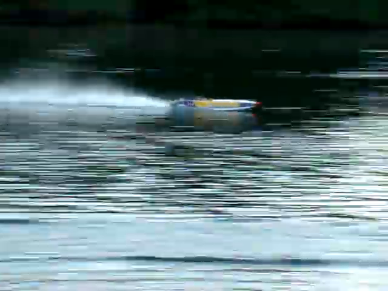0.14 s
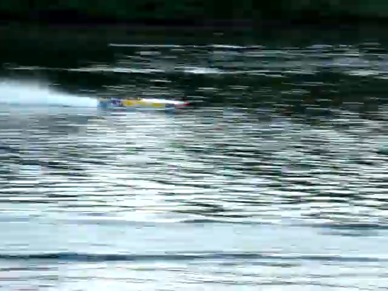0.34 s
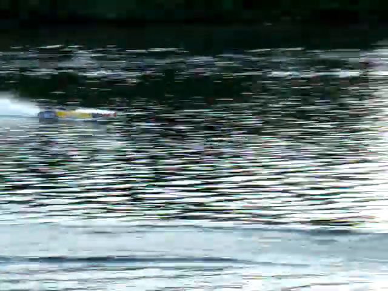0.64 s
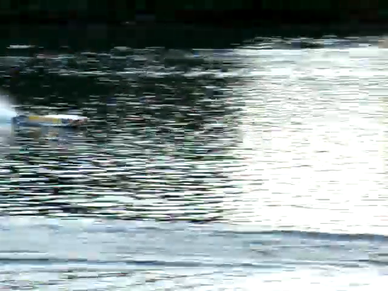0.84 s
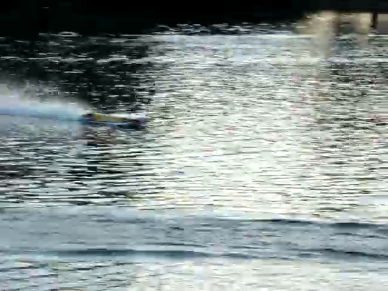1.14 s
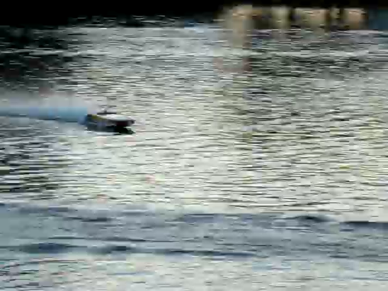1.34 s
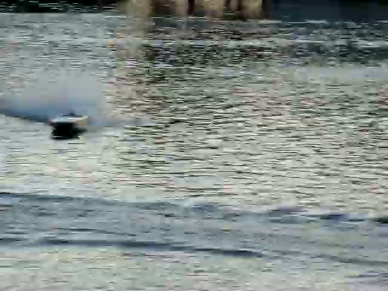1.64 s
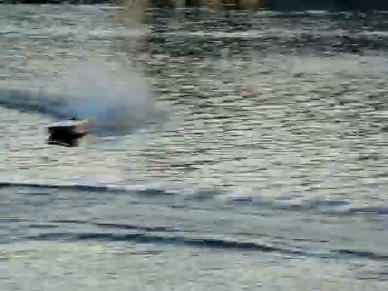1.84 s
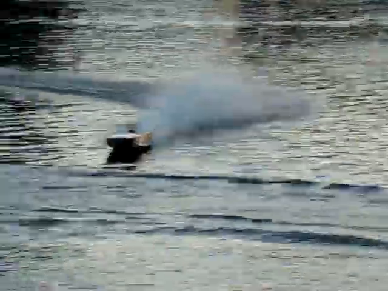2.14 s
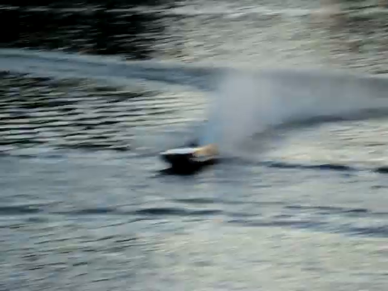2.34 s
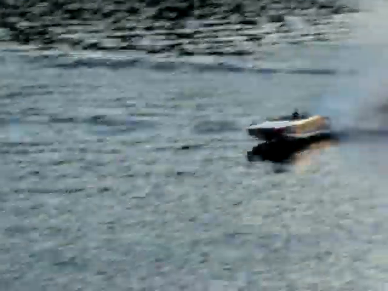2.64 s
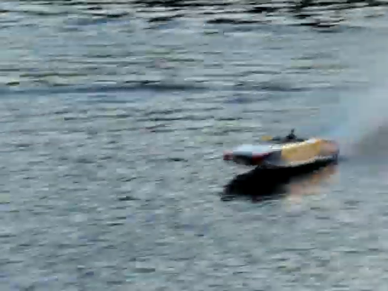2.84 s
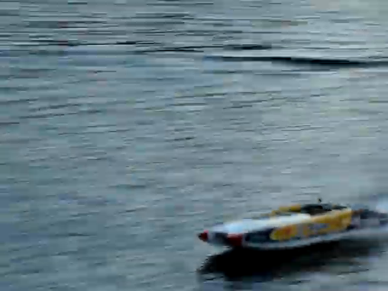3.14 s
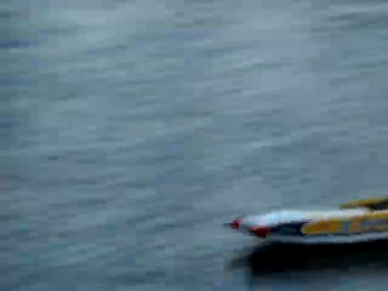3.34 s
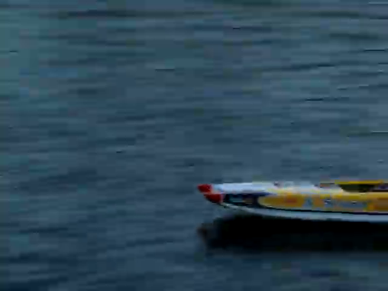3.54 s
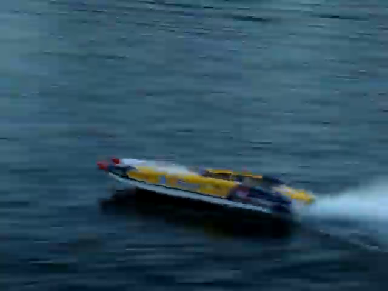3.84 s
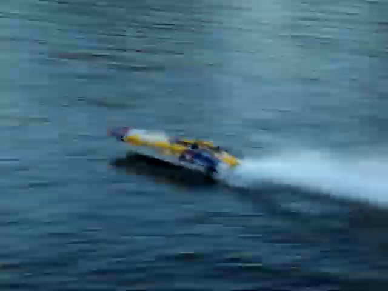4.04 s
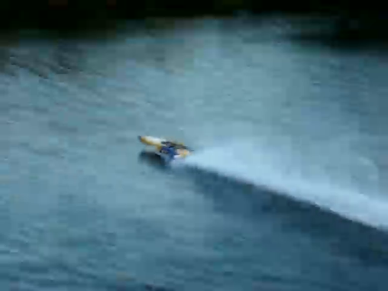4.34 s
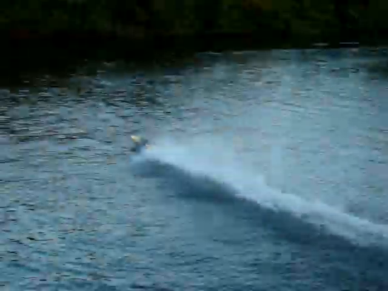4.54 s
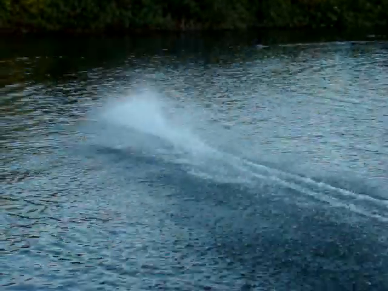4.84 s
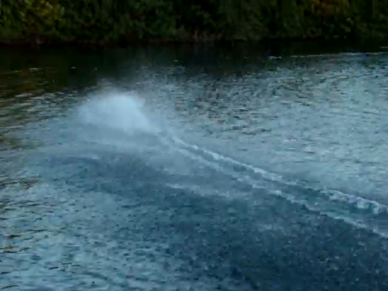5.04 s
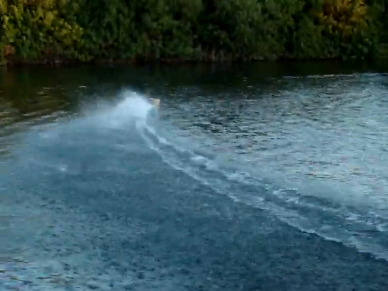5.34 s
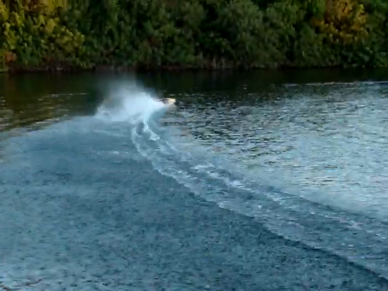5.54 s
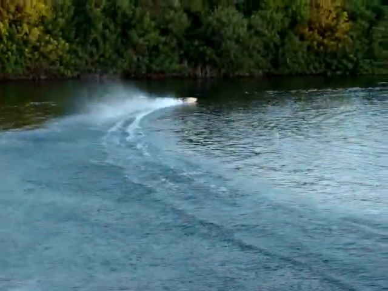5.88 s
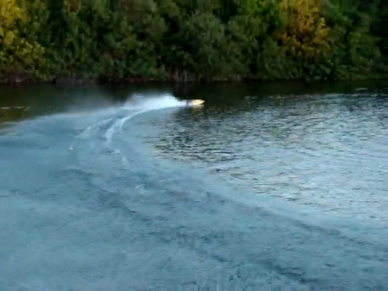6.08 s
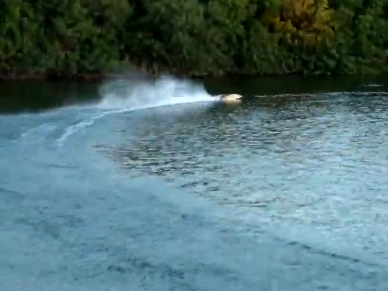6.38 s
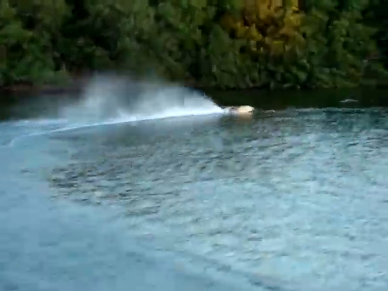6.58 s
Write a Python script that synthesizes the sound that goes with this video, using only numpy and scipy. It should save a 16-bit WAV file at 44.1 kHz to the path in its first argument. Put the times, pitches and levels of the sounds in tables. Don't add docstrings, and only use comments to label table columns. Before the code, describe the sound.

A model boat's raspy engine laps near a single bank microphone. Its falling note breaks into uneven pops while blurred echoes of an earlier run hang over the water. It revs up with wavering metallic overtones, passes loudly, stutters, pulls away and grows thin and quiet. Two more stutters lead to hull slaps and rising revs; a tiny camera motor hums very faintly.

```python
import sys
import numpy as np
from scipy import signal
from scipy.fft import rfft, irfft, next_fast_len
from scipy.io import wavfile
from scipy.ndimage import uniform_filter1d, map_coordinates

SR = 44100
rng = np.random.default_rng(int(sys.argv[2]) if len(sys.argv) > 2 else 0)


def transcribe(signal):
    frames = np.atleast_2d(signal).T
    limited = np.clip(frames, -1, 1)
    pcm = np.round(limited * 32767).astype(np.int16)
    wavfile.write(sys.argv[1], SR, pcm)


def elevation(decibels):
    levels = np.asarray(decibels, float)
    return 10 ** (levels / 20)


N = 295911

# (from [s], to [s], size of even firings [ratio], of odd firings [ratio])
MISFIRES = [
    (.5, .855, .25, .25),
    (3.225, 3.495, .4, .4),
    (5.2, 5.33, .6, .55),
    (5.92, 6.04, .3, .3),
]
# (time [s], round trip [ms], return level [dB], clutter level [dB])
RETURN = [(0, 1.5, -14, -2), (1.5, 1.45, -13, -2), (1.9, 1.2, -13, -3), (2.0, 2.45, -13, -4),
          (3.0, 2.38, -11, -4), (3.3, 2.5, -13, -4), (3.7, 2.5, -13, -4), (4.1, 2.59, -9, -6),
          (5.0, 2.66, -11, -6), (5.65, 2.61, -9, -6), (6.1, 2.58, -13, -7), (6.45, 2.6, -10, -9),
          (6.71, 2.6, -10, -9)]
# (time [s], exhaust level [dB], pipe mouth facing camera [dB], hull side level [dB],
# pipe on tune [dB])
COURSE = [(0, -27.5, -18, -37, -1.5), (.3, -29.5, -24.5, -40, 3.5), (.6, -28.5, -3.5, -32, -6.5),
          (.95, -24, -11, -34, -12), (1.3, -26.5, -13, -30, -9), (1.65, -27, -18.5, -28, 4),
          (2.05, -24.5, -6.5, -32.5, 2), (2.6, -22, 0.5, -31, -7), (2.95, -25.5, -5, -38.5, -4.5),
          (3.3, -30, 0.5, -44.5, 5.5), (3.8, -29.5, 13, -45.5, 1.5), (4.3, -27, 9, -54, 0),
          (4.85, -28, -7, -54, -1), (5.05, -37.5, 9, -57.5, -1.5), (5.45, -40, 16, -49.5, 3.5),
          (5.85, -38.5, 10.5, -55, 2), (6.22, -24.5, -8, -48, -3.5), (6.71, -24, -2, -36.5, -0.5)]
# (time [s], level [dB], half length [s], extra howl [dB])
BLASTS = [(0.422, -11, 0.11, -2), (0.81, 1, 0.082, 3), (0.96, 2.5, 0.18, 7), (1.645, -4, 0.039, -3),
          (2.03, 0, 0.34, 8), (2.29, 0, 0.21, 5.5), (2.597, 2, 0.012, 3.5), (2.88, 5.5, 0.022, 2.5),
          (2.936, 7, 0.043, -5), (3.061, 6, 0.022, 4.5), (3.104, 0.5, 0.024, 1.5),
          (3.147, -19.5, 0.09, 9.5), (3.374, -0.5, 0.085, 7.5), (3.51, 2, 0.058, 2.5), (4.303, -2, 0.03, 0),
          (4.397, 2.5, 0.057, -2), (4.527, 3.5, 0.027, -7), (4.594, 5.5, 0.011, 1), (4.793, 2, 0.055, -2.5),
          (4.635, 4, 0.064, -5), (4.927, 5, 0.057, 2.5), (4.988, -10, 0.035, 14.5), (5.148, 6.5, 0.067, -1),
          (5.254, 0.5, 0.081, -4.5), (5.312, 0.5, 0.064, -1.5), (5.518, 3.5, 0.17, -5),
          (5.732, 6, 0.13, 0.5), (6.197, -1, 0.048, 7), (6.292, 0, .06, -8), (6.407, 4.5, 0.023, 0),
          (6.456, 2, 0.018, -3), (6.62, 2, 0.017, -2), (6.573, -1, .03, 4)]


def unit(x):
    return x / np.sqrt(np.mean(x ** 2) + 1e-20)


def curves(rows):
    s, *cols = np.transpose(rows)
    return [np.interp(np.arange(N) / SR, s, c) for c in cols]


def bumps(rows):
    t = np.arange(N) / SR
    return sum(h * np.interp(t, [s - rise, s, s + fall], [0, 1, 0]) for s, h, rise, fall in rows)


def wobble(rate_hz):
    knots = rng.standard_normal(int(N * rate_hz / SR) + 4)
    return map_coordinates(knots, [np.arange(N) * rate_hz / SR])


def filtered(x, response):
    m = next_fast_len(N + SR // 2)
    return irfft(rfft(x, m) * response(np.fft.rfftfreq(m, 1 / SR)), m)[:N]


def resonant(x, modes, sign=-1):
    def response(f):
        return sum(sign ** k * elevation(db) * 1j * f * w / (c * c - f * f + 1j * f * w)
                   for k, (c, w, db) in enumerate(modes))
    return filtered(x, response)


def low_cut(x, hz):
    return signal.sosfilt(signal.butter(3, hz, "high", fs=SR, output="sos"), x)


def levelled(x):
    return x / np.sqrt(np.abs(uniform_filter1d(x ** 2, SR // 8)) + 1e-12)


def pulses(at, size):
    index = np.floor(at).astype(int)[:, None] + np.arange(-7, 9)
    offset = index - at[:, None]
    kernel = np.sinc(offset) * np.cos(np.pi * offset / 16) ** 2
    return np.bincount(np.clip(index, 0, N).ravel(), (kernel * size[:, None]).ravel(), N + 1)[:N]


def decaying(x, fall_s):
    return signal.lfilter([1], [1, -np.exp(-1 / (fall_s * SR))], x)


def engine():
    # (time [s], rate [firings/s])
    throttle = [(-0.0, 222.1), (0.092, 167.0), (0.445, 84.2), (0.73, 126.2), (1.387, 119.5), (2.045, 250.1),
                (2.33, 221.5), (2.597, 243.8), (2.932, 231.3), (3.221, 138.1), (3.698, 183.7),
                (3.848, 228.9), (4.933, 233.3), (5.03, 183.5), (5.81, 211.8), (5.923, 132.1),
                (6.237, 191.8), (6.71, 225.4)]
    # (time [s], change [firings/s], rise
    # [s], fall [s])
    hops = [(0.949, 60.4, 0.13, 0.34), (1.627, 39.8, 0.18, 0.1), (1.81, -48.1, 0.09, 0.22),
            (2.585, 10, .015, .04), (4.575, 6, .03, .02), (3.93, -5, .03, .03), (2.718, 6.2, 0.16, 0.03),
            (2.766, -21.4, 0.03, 0.16), (3.08, 20.8, 0.05, 0.11), (3.29, -12.8, 0.06, 0.1),
            (3.46, -19.3, 0.08, 0.05), (3.53, 9.6, 0.02, 0.18), (4.069, -11.4, 0.21, 0.3),
            (4.365, -10.1, 0.3, 0.29), (4.623, -14.9, 0.09, 0.17), (4.84, -17.8, 0.06, 0.08),
            (5.17, 22.0, 0.07, 0.04), (5.251, -28.0, 0.05, 0.16), (5.311, -12.4, 0.06, 0.12),
            (5.64, 1.2, 0.24, 0.27), (6.038, -18.0, 0.1, 0.1), (6.43, 11.9, 0.06, 0.27),
            (1.53, -5, .04, .03), (1.58, 5, .04, .04), (1.79, 4, .04, .03), (1.855, -16, .03, .03),
            (2.05, 3, .03, .03), (2.14, 2, .04, .04), (2.34, 4, .04, .04), (2.51, -3, .06, .05),
            (2.58, 5, .015, .02), (2.64, -4, .04, .08), (2.78, 4, .025, .03), (2.845, -3, .04, .015),
            (2.875, 3, .02, .05), (3.86, 4, .03, .03), (3.98, 5, .04, .025), (4.02, -4, .02, .03),
            (4.62, -3, .03, .03), (4.74, -4, .03, .03), (4.86, -6, .03, .025), (4.9, 5, .025, .03),
            (5.18, 4, .03, .03), (6.09, 4, .04, .03), (6.14, -5, .025, .03), (6.3, -3, .03, .03),
            (6.37, 3, .05, .06), (6.58, -3, .03, .04)]
    inertia_s = .022
    rate = uniform_filter1d(curves(throttle)[0] + bumps(hops), round(inertia_s * SR))
    turns = np.cumsum(rate * (1 + .002 * wobble(25))) / SR
    blast_db = bumps([(s, db, half, half) for s, db, half, _ in BLASTS])
    return exhaust(turns, rate, blast_db) + shaft_orders(turns, rate, blast_db) + singing(turns)


def exhaust(turns, rate, blast_db):
    # (frequency [Hz], width [Hz], level [dB])
    boom_modes = [(1060, 190, 0), (1290, 190, -1), (880, 150, -7)]
    howl_modes = [(1625, 280, -7), (1950, 235, 0.5)]
    bark_modes = [(2642, 650, 24), (3120, 370, 17.5), (4630, 1700, -4.5)]
    rasp_modes = [(4950, 850, -6.5), (6500, 3600, 3.5), (8100, 400, -4.5)]
    # (level over exhaust [dB], share of swings, share of facing, share of tune)
    boom_law = (-7, 1.13, -0.01, 1.16)
    howl_law = (-6.5, 0.95, 0.07, 0.35)
    rasp_law = (-12.5, 2.53, 1.4, 2)
    mean_db = -28

    cracks, puffs = firings(turns, rate, jitter=.003, puff_s=.004)
    cracks = cockpit(cracks, ring_s=.03, ring_db=curves(RETURN)[2])
    bark_db, facing_db, _, tune_db = curves(COURSE)
    bark_db = bark_db + blast_db
    sing_db = bumps([(s, db, half, half) for s, _, half, db in BLASTS])
    flutter_db = 1.2 * wobble(22)

    def range_db(law):
        db, swing, turn, tune = law
        course_db = swing * (bark_db - mean_db) + turn * facing_db + tune * tune_db
        return mean_db + db + course_db + .8 * wobble(8)

    boom = low_cut(low_cut(resonant(cracks + .4 * puffs, boom_modes), hz=820), hz=820)
    howl = low_cut(resonant(cracks + .45 * puffs, howl_modes, sign=1), hz=1200)
    bark = low_cut(resonant(cracks + .45 * puffs, bark_modes, sign=1), hz=1800)
    turbulence = 2.4 * puffs + 1.8 * np.roll(puffs, SR // 400)
    rasp = low_cut(resonant(cracks + turbulence, rasp_modes, sign=1), hz=3500)
    return (elevation(range_db(boom_law)) * levelled(boom)
            + elevation(range_db(howl_law) + sing_db) * levelled(howl)
            + elevation(bark_db + flutter_db) * levelled(bark)
            + elevation(range_db(rasp_law) - .35 * blast_db) * levelled(rasp))


def firings(turns, rate, jitter, puff_s):
    # (load [firings/s], noise share [0-1], size scatter [dB])
    combustion = [(125, .42, 4), (155, .2, 2.2), (180, .055, 1), (225, .035, .75)]
    # (time [s], size over a regular firing [dB])
    pops = [(.519, 4), (.540, 6.5), (0.5716, 9), (0.5895, 3), (.609, 7), (0.6256, 6.5), (.644, 7.5),
            (0.6695, 5.5), (0.6844, 5), (0.7014, 5), (0.718, 7), (.733, 3), (0.75, 6), (.765, 5),
            (0.781, 2.5), (0.7964, 3.5), (0.811, 1), (0.8363, 2.5), (0.8512, -2), (3.2449, 10),
            (3.268, 8.5), (3.282, 11), (3.2963, 4.5), (3.3023, 7), (3.318, 9), (3.3334, 12), (3.348, 10),
            (3.3612, 9.5), (3.365, 0.5), (3.3773, 6), (3.3886, 11), (3.4035, 4), (3.4217, 6.5), (3.434, 2),
            (3.4495, 3), (3.463, 3), (3.4753, 1), (3.4888, -1.5), (5.2135, 2.5), (5.241, -1), (5.271, 6),
            (5.293, -6.5), (5.3028, 4.5), (5.316, -4.5), (5.3266, 0), (5.9327, 2.5), (5.9435, 6.5),
            (5.968, 11), (5.981, 2), (5.991, 10.5), (6.0058, 0.5), (6.022, 10), (6.037, 8.5)]
    lead_s = .14
    rise = np.maximum(uniform_filter1d(np.gradient(rate), SR // 10), 0)
    load = rate + lead_s * SR * rise
    speeds, shares, scatters = np.transpose(combustion)
    share = np.interp(load, speeds, shares)
    scatter_db = np.interp(load, speeds, scatters)

    whole = np.arange(1, int(turns[-1]))
    at = np.interp(whole + jitter * rng.standard_normal(len(whole)), turns, np.arange(N))
    size = elevation(scatter_db[at.astype(int)] * rng.standard_normal(len(at)))
    for a, b, even, odd in MISFIRES:
        inside = (at > a * SR) & (at < b * SR)
        size = np.where(inside, size * np.where(whole % 2, odd, even), size)
    s, db = np.transpose(pops)
    at, size = np.append(at, s * SR), np.append(size, elevation(db))

    cracks = pulses(at, size)
    puffs = decaying(cracks, puff_s) * rng.standard_normal(N) / np.sqrt(puff_s * SR / 2)
    trip_ms, back_db, _ = [c[at.astype(int)] for c in curves(RETURN)]
    cracks = -cracks - pulses(at + trip_ms * SR / 1000, size * elevation(back_db))
    return np.sqrt(1 - share) * cracks, np.sqrt(share) * puffs


def cockpit(x, ring_s, ring_db):
    t = np.arange(SR // 50) / SR
    tails = rng.standard_normal((3, len(t))) * elevation(-60 * t / ring_s) * (t > .0008)
    tails /= np.linalg.norm(tails, axis=1)[:, None]
    echoes = sum(wobble(7) * np.convolve(x, tail)[:N] for tail in tails)
    return x + elevation(ring_db) * echoes / np.sqrt(3)


def shaft_orders(turns, rate, blast_db):
    # (frequency [Hz], level [dB])
    panels = [(90, -11.5), (180, -4.5), (260, -2.5), (375, 1.5), (500, 2), (680, -13), (950, 7)]
    # (level over hull side [dB], share of its swings)
    orders_law = [(-1.5, 0.77), (0, 0.83), (-4, 1.01), (-2, 0.91)]
    side_mean_db, starved_db = -43, -5.5
    starved = [((a + b) / 2, starved_db, b - a, b - a) for a, b, *_ in MISFIRES[1:]]
    side_db = curves(COURSE)[2] + bumps(starved)
    hz, db_at_hz = np.transpose(panels)
    tones = 0
    for order, (db, swing) in enumerate(orders_law, 1):
        panel_db = np.interp(np.log(order * rate), np.log(hz), db_at_hz)
        waver_db = 1.8 * wobble(14) + 2.9 * wobble(30)
        order_db = side_mean_db + swing * (side_db - side_mean_db) + db + .35 * blast_db
        tones = tones + elevation(order_db + panel_db + waver_db) * np.sin(2 * np.pi * order * turns)
    return tones


def singing(turns):
    sings = {2: [(.92, 0.079, 0.11, -34), (1.6, 0.14, 0.2, -30), (2.2, 0.47, 0.22, -32),
             (3.98, 0.21, 0.11, -45), (5.72, 0.12, .1, -42)], 3: [(2.55, 0.69, 0.6, -32),
             (6.15, 0.22, 0.27, -40)], 4: [(.95, 0.092, 0.073, -35), (1.6, 0.15, 0.15, -24),
             (2.3, 0.9, 0.25, -30.5), (4.2, 0.51, 0.66, -36.5), (6.55, 0.3, 0.17, -33.5),
             (5.55, .15, 0.12, -44)], 5: [(.95, 0.075, 0.086, -22.5), (1.58, 0.23, 0.11, -25.5),
             (5.65, 0.3, 0.32, -31.5), (6.2, 0.069, 0.11, -46)], 6: [(1.65, 0.13, 0.065, -22.5),
             (2.06, .06, .06, -33), (4.2, 0.15, 0.18, -40), (5.08, 0.18, 0.052, -38),
             (5.38, 0.054, 0.033, -32), (6.6, 0.12, 0.18, -27.5)], 7: [(1.81, 0.11, .15, -33),
             (5.7, .1, 0.11, -41), (2.37, 0.11, 0.16, -30), (3.53, 0.066, 0.16, -29),
             (6.45, 0.22, 0.18, -28.5)], 8: [(1.97, 0.12, 0.13, -29), (3.38, 0.11, .1, -32),
             (4.72, 0.48, 0.32, -34), (3.65, .07, .07, -40), (6.15, 0.055, .08, -28),
             (2.66, .06, .06, -31)], 9: [(2.92, 0.18, 0.3, -26), (4.2, 0.18, .3, -40),
             (1.66, .06, 0.068, -32), (1.96, 0.16, .05, -28), (5.65, 0.42, .17, -51),
             (6.36, .06, 0.065, -34), (6.58, 0.072, 0.1, -44)]}
    sings_high = {10: [(1.72, 0.085, .1, -26.5), (2.06, 0.055, 0.049, -41), (3.04, 0.088, .06, -29),
                  (4.22, 0.097, 0.15, -35), (4.58, 0.22, 0.29, -38)], 11: [(0.98, 0.062, .07, -28),
                  (3.18, .07, .08, -37), (3.36, .05, .04, -33), (2.51, 0.087, .2, -35),
                  (4.45, 0.26, 0.21, -39), (2.7, 0.07, 0.09, -33), (3.62, 0.086, 0.16, -37),
                  (3.86, .06, .06, -38), (5.72, .2, 0.11, -41)], 12: [(2.3, 0.097, 0.12, -33),
                  (4.4, 0.18, 0.13, -32), (6.5, 0.22, 0.15, -43.5), (3.66, .08, .08, -36),
                  (5.5, .1, .12, -46)], 13: [(2.9, .06, 0.11, -21.5), (4.15, .15, 0.12, -52),
                  (5.06, .08, 0.14, -42)], 14: [(2.62, 0.15, 0.14, -32), (2.86, 0.05, .05, -29),
                  (3.06, .06, 0.062, -29), (3.86, .06, .06, -32), (4.46, .08, .08, -38),
                  (4.76, .08, .06, -31), (5.66, 0.06, 0.073, -42), (6.3, 0.18, .12, -34)],
                  15: [(2.36, 0.083, 0.092, -21), (2.96, .08, .06, -18), (3.66, 0.068, 0.077, -33.5),
                  (5.56, 0.089, 0.069, -49)], 16: [(1.86, .06, 0.05, -34), (2.26, 0.069, .06, -26),
                  (4.46, .06, 0.052, -32), (6.26, 0.097, .06, -28), (6.58, .1, 0.19, -30)],
                  18: [(1.56, .08, .06, -30), (2.16, .06, .06, -31), (3.66, .06, .06, -34),
                  (6.25, 0.13, 0.074, -25), (6.56, 0.072, 0.082, -44)]}
    song = 0
    for order, rows in {**sings, **sings_high}.items():
        swell = bumps([(s, elevation(db), rise, fall) for s, rise, fall, db in rows])
        phase = 2 * np.pi * order * turns + .45 * wobble(40)
        song = song + swell * elevation(3.1 * wobble(25)) * np.sin(phase)
    return song


def slaps():
    # (time [s], peak level [dB])
    smacks = [(5.85, -21.5), (5.889, -16.5), (6.07, -13.5), (6.11, -19), (6.15, -10), (6.19, -11.5),
              (6.22, -15.5), (6.292, -15), (6.382, -16), (6.495, -15.5), (6.534, -13)]
    # (frequency [Hz], width [Hz], level [dB])
    skin = [(600, 240, -8), (1030, 220, 2.5), (1970, 620, -5)]
    s, db = np.transpose(smacks)
    gate = decaying(pulses(s * SR, elevation(db - 5)), fall_s=.0025)
    return resonant(gate * rng.standard_normal(N), skin) / np.std(resonant(rng.standard_normal(N), skin))


def water():
    # (time [s], hull drone level [dB], spray level [dB])
    levels = [(0, -30, -24), (.5, -25, -32.5), (.75, -21.5, -46), (.95, -24.5, -37.5), (1.59, -21.5, -24.5),
              (1.91, -28.5, -22), (2.2, -34, -22), (2.52, -37, -25), (2.9, -36, -25.5), (3.38, -34, -31.5),
              (3.59, -43.5, -32), (4.1, -58, -35), (4.41, -56.5, -49.5), (5.06, -50.5, -38.5),
              (5.5, -44, -57.5), (5.76, -40.5, -40), (5.9, -36.5, -46), (6.28, -33, -32.5),
              (6.71, -35, -26.5)]
    # (frequency [Hz], width [Hz], level [dB])
    hull_modes = [(127, 60, -29), (427, 51, 7), (495.4, 3, 23.5), (721, 9.4, 11.5), (770, 37, -24),
                  (780, 800, 13)]
    # (frequency [Hz], density [dB per Hz])
    spray = [(100, -27), (500, -11.5), (1200, -3.5), (2500, 6), (4500, -0.5), (10000, -10), (11000, -50.5)]
    thump_hz, thump_grows, close_db = 170, .77, -24.5
    hull_db, spray_db = curves(levels)
    hull = unit(low_cut(resonant(rng.standard_normal(N), hull_modes), hz=94.5))
    thump = filtered(hull, lambda f: 1 / (1 + (f / thump_hz) ** 6))
    hull = hull + (elevation(thump_grows * (hull_db - close_db)) - 1) * thump
    hz, db = np.transpose(spray)
    hiss = filtered(rng.standard_normal(N), lambda f: elevation(np.interp(np.log(f + 1), np.log(hz), db)))
    drone = elevation(hull_db + .83 * wobble(16) + 1.43 * wobble(80)) * hull
    return drone + elevation(spray_db + wobble(15)) * unit(hiss)


def shore(x):
    t60_s, delay = .16, 260
    t = np.arange(SR // 4) / SR
    tail = signal.lfilter([1], [1, -1.3, .5], rng.standard_normal(len(t))) * elevation(-60 * t / t60_s)
    return signal.fftconvolve(np.pad(x, (delay, 0)), tail / np.linalg.norm(tail))[:N]


def far_bank():
    # (frequency [Hz], time [s], rise [s], fall [s], level [dB])
    partials = [
        (2335, .15, .16, .13, -28),
        (2985, .2, .17, .1, -32),
        (1150, .42, .22, .12, -29),
        (506, .3, .35, .45, -33),
        (705, .72, .25, .2, -28),
        (1000, 5.92, .1, .12, -38),
    ]
    climb_per_s = .08
    t = np.arange(N) / SR
    echo = 0
    for hz, s, rise, fall, db in partials:
        swell = bumps([(s, elevation(db), rise, fall)]) * elevation(2 * wobble(30))
        cycles = hz * (t + climb_per_s * (t - s) ** 2 / 2)
        echo = echo + swell * np.sin(2 * np.pi * cycles + .4 * wobble(40))
    return echo


def camera():
    # (on [s], off [s])
    bursts = [
        (3.66, 3.775),
        (4.55, 4.665),
        (5.445, 5.56),
    ]
    t = np.arange(N) / SR
    on = sum((t > a) * (t < b) for a, b in bursts)
    hum = elevation(-53) * np.sin(2 * np.pi * 150.7 * t) + elevation(-66) * np.sin(2 * np.pi * 301.4 * t)
    rumble = unit(resonant(rng.standard_normal(N), [(40, 65, 0)]))
    return on * hum + elevation(-77.5) * rumble


def scene():
    boat = engine()
    mono = boat + elevation(-18.5) * shore(boat) + far_bank() + slaps() + water() + camera()
    return np.array([mono, mono])


def thin_treble(x, hz, under_db):
    f, _, z = signal.stft(x, SR, nperseg=256, noverlap=192)
    patch = uniform_filter1d(uniform_filter1d(np.abs(z) ** 2, 6, 0), 5, 1)
    running = uniform_filter1d(patch, 60, 1)
    weak = (patch < elevation(2 * under_db) * running) & (f[:, None] > hz)
    return signal.istft(z * np.where(weak, .04, 1), SR, nperseg=256, noverlap=192)[1][:N]


def top_cut(x):
    return signal.sosfilt(signal.butter(12, 11320, fs=SR, output="sos"), x)


def record(dry):
    mono = thin_treble(dry[0], hz=4800, under_db=-3.2)
    mono = filtered(mono, lambda hz: hz < 10250)
    return top_cut(np.array([mono, mono]))


dry = scene()
out = record(dry)
transcribe(out)
```